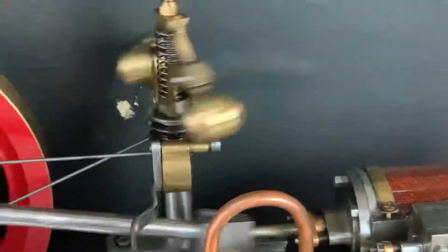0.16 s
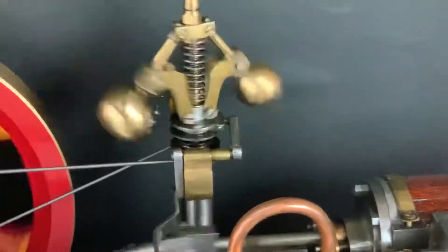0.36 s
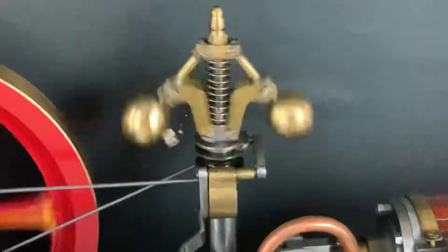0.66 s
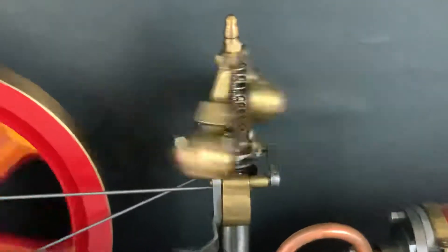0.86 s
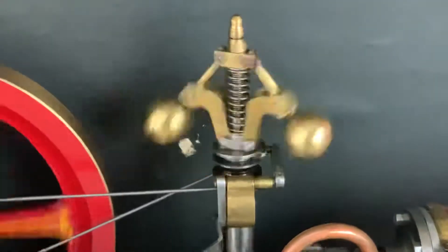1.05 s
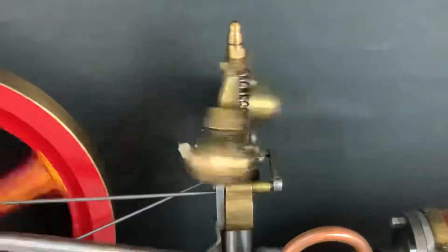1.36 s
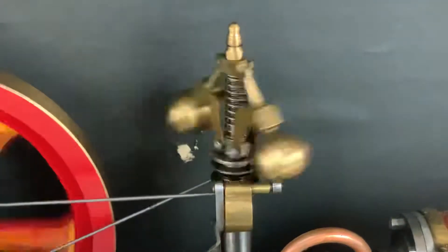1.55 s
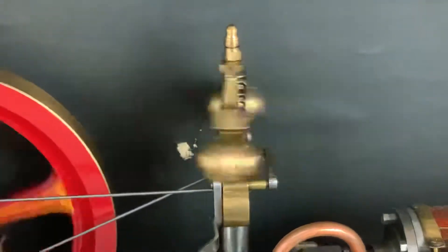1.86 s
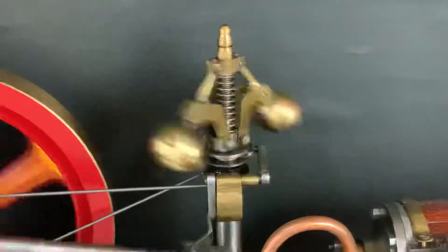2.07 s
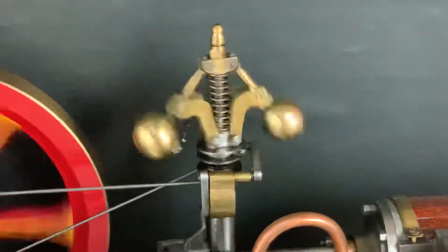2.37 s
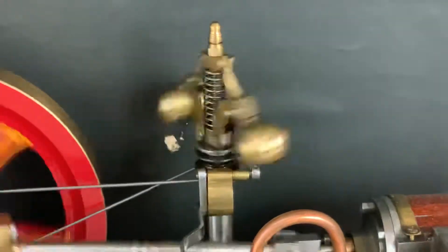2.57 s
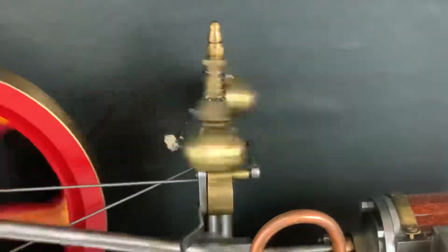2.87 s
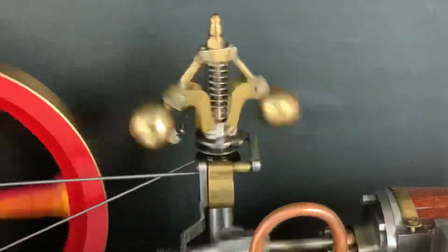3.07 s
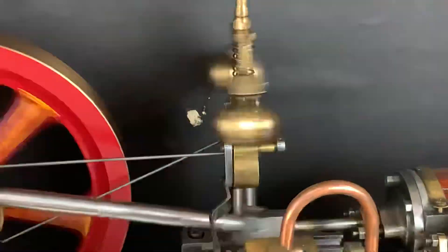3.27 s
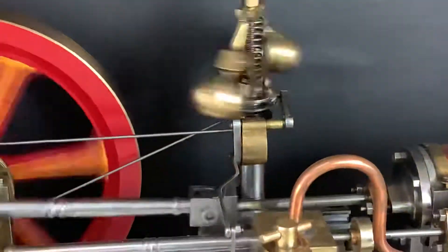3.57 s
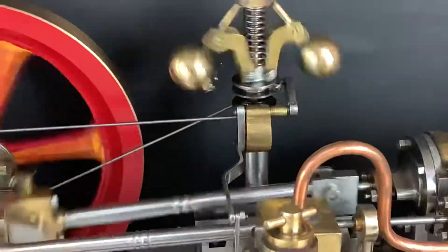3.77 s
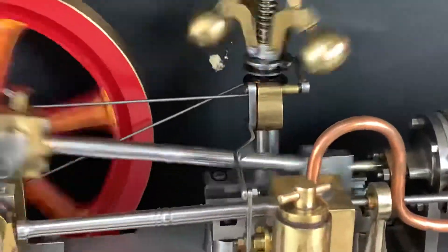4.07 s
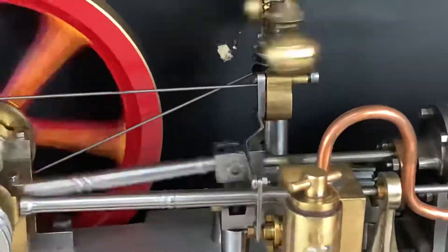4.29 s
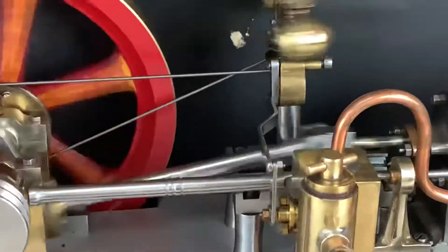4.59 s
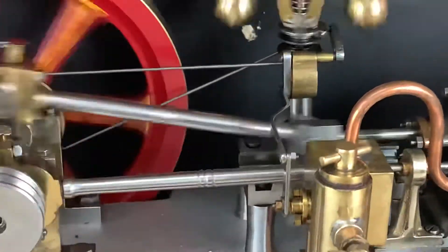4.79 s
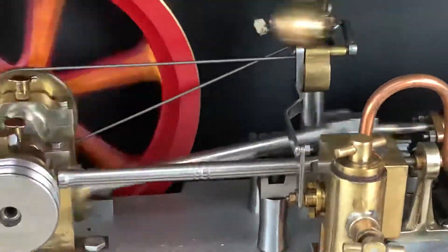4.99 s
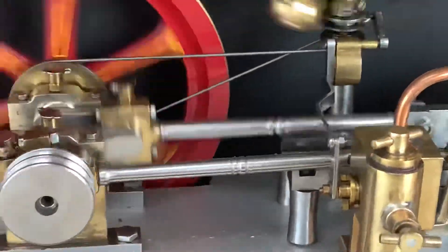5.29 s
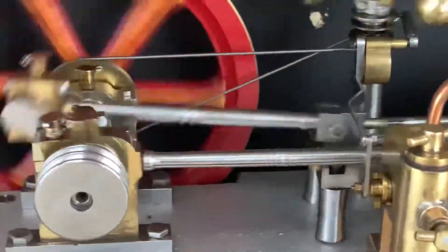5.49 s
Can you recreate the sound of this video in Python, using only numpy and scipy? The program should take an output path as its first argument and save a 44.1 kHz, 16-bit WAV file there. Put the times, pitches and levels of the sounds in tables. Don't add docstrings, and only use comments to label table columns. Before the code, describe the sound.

For about 5.6 seconds a small model steam engine runs close to a two-channel phone microphone in a quiet room, already turning at the start and still turning at the end. Each revolution takes about 0.38 to 0.4 seconds. A short, dull thump shakes the bench, followed by a soft double-struck metal knock, muffled bumps and light rod taps, then a harder clack about two thirds through the turn; fine ticks and loose link rattle fill between. The thumps are weak or late in the first 0.7 seconds, then strong and regular. Over everything lies continuous leaking air: bright, wide hiss, thin wavering whistles around 2 to 5 kHz, and a fluttering gear whirr. The hiss gains until about 1.8 seconds, eases slightly towards 2.9, then grows brighter to the end while the whirr and lower whistles fade back. Low room hum stays underneath, with very little reverberation.

```python
import sys
import numpy as np
from scipy import signal
from scipy.fft import rfft, irfft, next_fast_len
from scipy.io import wavfile
from scipy.ndimage import uniform_filter1d, map_coordinates

SR = 44100
rng = np.random.default_rng(int(sys.argv[2]) if len(sys.argv) > 2 else 0)


def makeup_ratio(level_db):
    decades = np.asarray(level_db, float) / 20
    return 10 ** decades


def persist_wave(psi):
    counts = np.round(np.clip(psi, -1, 1) * 32767).astype(np.int16)
    wavfile.write(sys.argv[1], SR, np.atleast_2d(counts).T)


N = 248724

# start_s (dead centre) [s], thump_db [dB], out_stroke_load_db [dB], return_stroke_load_db [dB]
TURNS = [(-.031, -30, -2.5, 0.5), (.333, -27, -1, -2), (.734, -16, -4, 1), (1.1503, -16, -2.5, 0),
         (1.555, -16, -1.5, -4), (1.9457, -16.5, -1.5, -3.5), (2.332, -16.5, -2, -0.3),
         (2.716, -16, -1, -2), (3.0951, -16.5, -1, -1.5), (3.479, -16, 0.2, 0), (3.8586, -15.5, -0.3, 0.5),
         (4.237, -16.5, 0.2, -0.5), (4.619, -16, .6, 0), (5, -15.5, 0, -1), (5.3822, -16, -0.5, -7),
         (5.763, -16, 0, 0)]
# frequency_hz [Hz], left_port_lead [radians]
ENGINE_LEAD = [(0, 0), (1030, .9), (1950, 3.45), (2240, 6), (3620, 7.8), (3950, 11.4), (4600, 10.5),
               (9000, 19)]
CLACK_TURN = .643
BENCH_PAN_DB = -1.7


def rms1(x):
    return x / np.sqrt(np.mean(x ** 2))


def coloured(points, channels=1):
    hz, db = np.transpose(points)
    size = next_fast_len(N)
    bin_hz = np.arange(size // 2 + 1) * SR / size
    gain = makeup_ratio(np.interp(np.log(bin_hz + 1), np.log(hz), db))
    white = rng.standard_normal((channels, size))
    return irfft(rfft(white) * gain, size)[:, :N]


def walk(rate_hz):
    hold = int(SR / rate_hz)
    steps = np.repeat(rng.standard_normal(N // hold + 1), hold)
    return uniform_filter1d(uniform_filter1d(steps, hold), hold)[:N]


def ring(force, modes):
    out = 0
    for hz, db, t60_s, way in modes:
        pole = np.exp(2j * np.pi * hz / SR - np.log(1000) / (t60_s * SR))
        out = out + np.sign(way) * makeup_ratio(db) * signal.lfilter([1], [1, -pole], force).imag
    return out


def push(force, start_s, impulse, contact_ms):
    length = max(int(contact_ms * SR / 1000), 1)
    shape = np.sin(np.pi * (np.arange(length) + .5) / length)
    i = int(start_s * SR)
    if 0 <= i < N - length:
        force[i:i + length] += impulse * shape / shape.sum()


def ports(x, lead, pan_db=0):
    size = next_fast_len(N + 256)
    bin_hz = np.arange(size // 2 + 1) * SR / size
    turn = np.interp(bin_hz, *np.transpose(lead))
    right = irfft(rfft(x, size) * np.exp(-1j * turn), size)[:N]
    return np.array([x * makeup_ratio(pan_db / 2), right * makeup_ratio(-pan_db / 2)])


def crank():
    when = np.transpose(TURNS)[0]
    count = np.arange(len(when))
    steady = np.linspace(when[0], when[-1], len(when))
    turns = np.linspace(0, len(when) - 1, num=600)
    drift = map_coordinates(when - steady, [turns], mode="nearest")
    return turns, np.interp(turns, count, steady) + drift


def bench(turns, s):
    # crank_angle [turns], level_db [dB], contact_ms [ms], direction [+1 or -1]
    blows = [(.170, -30.5, 2.8, -1), (.200, -32.5, .8, -1), (.227, -24, 2.2, -1), (.247, -23, 2.6, 1),
             (.263, -29.5, 1.9, 1), (.282, -32, .9, 1), (.431, -31, .3, 1), (.449, -22, 3.5, -1),
             (.481, -28, 3.5, 1), (.574, -33.5, 3.2, 1), (.647, -25.5, .3, 1), (.732, -19.5, 3.4, -1),
             (.845, -33, 3.5, -1), (.947, -33.5, 1.9, 1)]
    # time [turns], level_db [dB]
    late_thumps = [
        (0.208, -20),
        (1.21, -31.5),
    ]
    # pitch_hz [Hz], level_db [dB], t60_s [s], direction [+1 or -1]
    bench_modes = [(54.0, -11, 0.055, -1), (86.4, -8.3, 0.045, 1), (116, -16, 0.3, -1),
                   (196.9, -3.8, 0.162, 1), (222.6, 0.0, 0.234, -1), (261.4, -9.5, 0.089, -1),
                   (300.9, -7.2, 0.078, 1), (361.4, -9.3, 0.081, 1), (446.4, -14.0, 0.062, 1),
                   (481.7, -22.7, 0.222, -1)]
    force = makeup_ratio(-71) * rng.standard_normal(N) * makeup_ratio(3 * walk(25))
    lead_s, thump_ms = .0023, 1.6
    slip_s, vary_db = .0002, 1.
    for turn, db in late_thumps:
        push(force, np.interp(turn, turns, s) - lead_s, makeup_ratio(db), thump_ms)
    for k, (start_s, thump_db, out_db, back_db) in enumerate(TURNS):
        push(force, start_s - lead_s, makeup_ratio(thump_db), thump_ms)
        chance = rng.standard_normal((len(blows), 2))
        for (angle, db, contact_ms, way), (late, vary) in zip(blows, chance):
            load_db = out_db if angle < CLACK_TURN else back_db
            blow_s = np.interp(k + angle, turns, s) + slip_s * late
            push(force, blow_s, way * makeup_ratio(db + load_db + vary_db * vary), contact_ms)
    return ring(force, bench_modes)


def bracket(turns, s):
    # crank_angle [turns], level_db [dB]
    taps = [(.2, -30.5), (.232, -35), (.437, -36.5), (.462, -32), (.5, -39), (.655, -28.5), (.745, -36),
            (0.788, -39)]
    # pitch_hz [Hz], level_db [dB], t60_s [s], direction [+1 or -1]
    bracket_modes = [(286.6, -2.2, 0.1, 1), (354, -0.14, 0.084, -1), (468.3, -4, 0.073, 1),
                     (537, -7.5, 0.04, -1)]
    force = np.zeros(N)
    slip_s, vary_db = .0005, 1.5
    for k in range(len(TURNS)):
        for (angle, db), (late, vary) in zip(taps, rng.standard_normal((len(taps), 2))):
            tap_s = np.interp(k + angle, turns, s) + slip_s * late
            push(force, tap_s, makeup_ratio(db + vary_db * vary), .7)
    return ring(force, bracket_modes)


def knock_and_clack(turns, s):
    force = np.zeros(N)
    knock_turn, vary_db = .197, .5
    for k, (_, _, out_db, back_db) in enumerate(TURNS):
        knock = (knock_turn, -33.5 + 0.39 * out_db)
        clack = (CLACK_TURN, -27 + .05 * back_db)
        for angle, db in (knock, clack):
            hit_s = np.interp(k + angle, turns, s)
            hit_db = db + vary_db * rng.standard_normal()
            push(force, hit_s - .001, makeup_ratio(hit_db - 3.0), .15)
            bounce_s = hit_s + 0.001598 + 0.00031 * rng.random()
            push(force, bounce_s, makeup_ratio(hit_db - 12.0), .2)
    return force


def link_ticks(turns, s):
    # crank_angle [turns], level_db [dB]
    ticks = [(.084, -38), (.221, -48), (.297, -33.5), (.362, -35), (.565, -41.5), (.775, -39.5), (.84, -40)]
    force = makeup_ratio(-78.0) * rng.standard_normal(N) * makeup_ratio(6.5 * walk(60))
    slip_s, vary_db = 0.000956, 1.8
    for k in range(len(TURNS)):
        for (angle, db), (late, vary) in zip(ticks, rng.standard_normal((len(ticks), 2))):
            tick_s = np.interp(k + angle, turns, s) + slip_s * late
            push(force, tick_s, makeup_ratio(db + 0.5 + vary_db * vary), .22)
    return force


def valve_gear(turns, s):
    # pitch_hz [Hz], level_db [dB], t60_s [s], direction [+1 or -1]
    valve_modes = [(496, 0.5, 0.016, -1), (664, -7, 0.039, 1), (800, -1, 0.015, -1), (979, 2, 0.035, 1),
                   (1080, -7.5, 0.091, -1), (1271, 1.5, 0.054, 1), (1568, -0.5, 0.052, -1),
                   (1780, -1, 0.019, 1), (2138, 3, 0.028, -1), (2290, 4.5, 0.015, 1)]
    link_modes = [(837, -4.5, 0.052, 1), (912, -3.5, 0.088, -1), (1090, -7.5, 0.018, 1),
                  (1290, -2.2, 0.051, -1), (1420, -6.5, 0.0079, 1)]
    near = ring(knock_and_clack(turns, s), valve_modes) + ring(link_ticks(turns, s), link_modes)
    decay = np.exp(-np.log(1000) * np.arange(SR // 8) / (.12 * SR))
    tail = rng.standard_normal((2, SR // 8)) * decay
    wall = signal.fftconvolve(near[None], tail, axes=1)[:, :N]
    return ports(near, ENGINE_LEAD) + makeup_ratio(-28.5) * wall


def jet_lead():
    # frequency_hz [Hz], left_port_lead [radians]
    bend = [(0, 0), (5250, -3.1), (6300, -6.3), (7700, -7.6), (8700, -9.4), (14600, -21.5), (15800, -23.25)]
    hz = np.arange(0, SR / 2, 50.)
    lead = np.interp(hz, *np.transpose(bend))
    return np.transpose([hz, lead - .25 * np.sin(2 * lead)])


def jet_hiss(travel):
    # frequency_hz [Hz], level_db [dB per Hz]
    near_hiss = [(2100, -49), (3500, 0), (5000, -5), (7000, -8.5), (9000, 2.5), (11500, 3.5), (13000, 7),
                 (14500, 3.5)]
    far_hiss = [(2100, -54), (5000, -34), (7000, -16.5), (9000, -7), (13000, -7.5), (14500, -8)]
    jet = coloured(near_hiss)[0]
    top = signal.sosfiltfilt(signal.butter(4, 11600, "high", fs=SR, output="sos"), jet)
    jet = jet + (makeup_ratio(1.8 * (travel - 1.5)) - 1) * top
    near = ports(jet * makeup_ratio(1.25 * walk(30) - 1.07), jet_lead())
    far = ports(coloured(far_hiss)[0] * makeup_ratio(0.69 * walk(9)), jet_lead())[::-1]
    return near + far


def gear_whirr():
    # frequency_hz [Hz], level_db [dB per Hz]
    whirr = [(700, -11.5), (1300, -10.5), (1900, -2.5), (2500, -21), (3500, -4), (4500, -24), (6500, -1),
             (9000, -47)]
    return ports(coloured(whirr)[0] * makeup_ratio(2.8 * walk(22.02)), ENGINE_LEAD)


def echoes(x):
    decay = np.exp(-np.log(1000) * np.arange(SR // 16) / (0.061 * SR))
    tail = rng.standard_normal((2, SR // 16)) * decay * makeup_ratio(-25)
    tail[:, 0] = 1
    tail = tail / np.sqrt(np.sum(tail ** 2, axis=1, keepdims=True))
    return signal.fftconvolve(x, tail, axes=1)[:, :N]


def scattered_hiss():
    # frequency_hz [Hz], level_db [dB per Hz]
    spectrum = [(300, -6), (700, -13), (1500, -22), (2100, -27), (2600, -2.5), (5200, -5.5), (8800, -9.5),
                (15700, -54)]
    return echoes(coloured(spectrum, channels=2) * makeup_ratio(1.7 * walk(21.97)))


def whistles(low_db, high_db):
    # pitch_hz [Hz], width_hz [Hz], level_db [dB], left_port_lead [radians]
    fittings = [(2207, 35, -18.5, 0.39), (2524, 14, -20, 1.1), (2560, 48, -14.5, 4.3),
                (2703, 39, -14.5, 0.77), (2785, 60, -21, 2.9), (3130, 25, -17, 2.36),
                (3157, 15, -17.5, 1.9), (3940, 48, -21, 3), (3968, 130, -15, 0.14), (4336, 35, -12, 0.76),
                (4536, 72, -13, 2.2), (4817, 35, -19, 1.1), (5360, 110, -38, 2), (5885, 10, -19, 1.2)]
    sing = 0
    for hz, width_hz, db, lead in fittings:
        t60_s = np.log(1000) / (np.pi * width_hz)
        tone = ring(rng.standard_normal(N), [(hz, 0, t60_s, 1)])
        near_db = low_db if 2400 < hz < 3500 else high_db
        waver_db = 0.5 * walk(1.24) + 2.15 * walk(9)
        tone = rms1(tone) * makeup_ratio(db + near_db + 5.5 + waver_db)
        sing = sing + ports(tone, [(0, lead), (SR, lead)])
    return sing


def air(turns, s):
    # time_s [s], travel [0-1]
    phone_path = [
        (0, 0),
        (1.8, 0.4),
        (2.9, 0.25),
        (4, 0.59),
        (5.64, 0.8),
    ]
    t = np.arange(N) / SR
    travel = np.interp(t, *np.transpose(phone_path))
    jet_db = -36.5 + 1.82 * travel
    low_db = -3.5 - 6.5 * travel
    high_db = -7 + 1.55 * travel
    flow_db = jet_db + 0.18 * np.cos(2 * np.pi * (np.interp(t, s, turns) - .25))
    mix = jet_hiss(travel) + whistles(low_db, high_db)
    mix = mix + makeup_ratio(low_db + 8.5) * gear_whirr()
    mix = mix + makeup_ratio(0.36 * low_db + 5.0) * scattered_hiss()
    return makeup_ratio(flow_db + 4.5) * mix


def room():
    # frequency_hz [Hz], level_db [dB per Hz]
    hum = [(25, -34), (45, -4.5), (90, -8.5), (115, -3), (160, -6), (300, -26.5), (520, -11.5), (800, -54)]
    mid, side = coloured(hum, channels=2)
    both = rms1(mid + 0.085 * side * np.array([[1], [-1]]))
    return makeup_ratio(-43 + np.array([[.5], [-.5]]) * BENCH_PAN_DB) * both


def scene():
    # frequency_hz [Hz], left_port_lead [radians]
    bench_lead = [(0, 0.17), (100, -0.15), (450, 0.5), (1000, 0.52)]
    turns, s = crank()
    wood = ports(bench(turns, s) + bracket(turns, s), bench_lead, BENCH_PAN_DB)
    return wood + valve_gear(turns, s) + air(turns, s) + room()


def roll_off(x):
    return signal.sosfilt(signal.butter(12, 15780, fs=SR, output="sos"), x)


def record(dry):
    low_cut = signal.butter(4, 41, "high", fs=SR, output="sos")
    top_cut = signal.ellip(8, .2, 70, 15750, fs=SR, output="sos")
    mix = signal.sosfilt(np.vstack([low_cut, top_cut]), dry)
    return roll_off(mix)


dry = scene()
out = record(dry)
persist_wave(out)
```